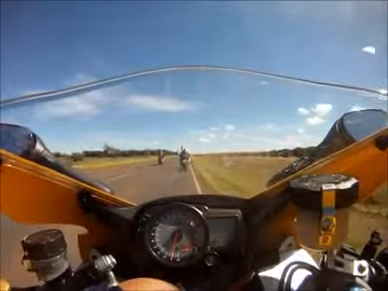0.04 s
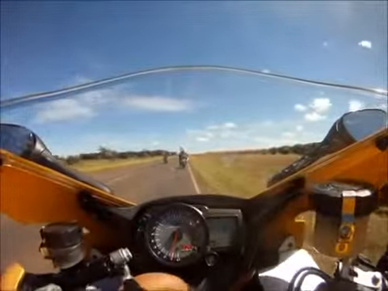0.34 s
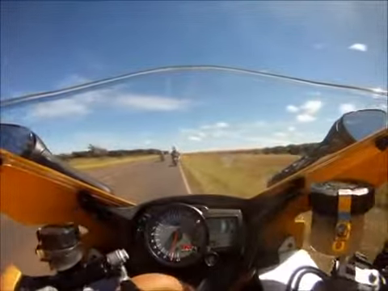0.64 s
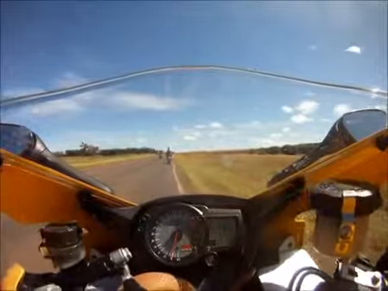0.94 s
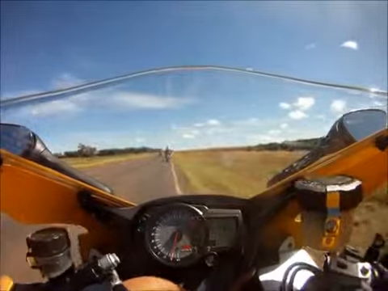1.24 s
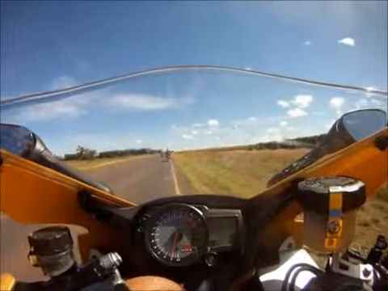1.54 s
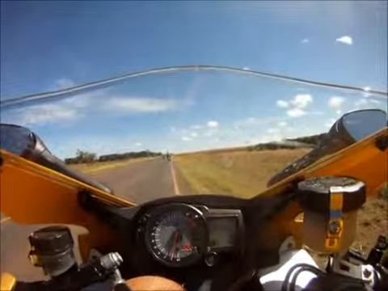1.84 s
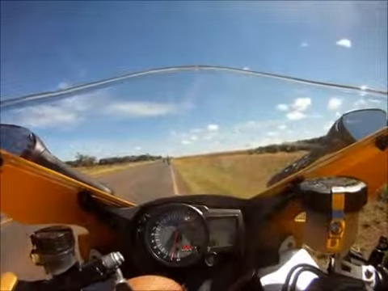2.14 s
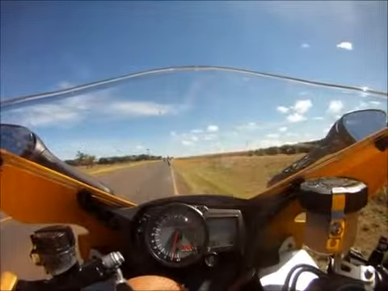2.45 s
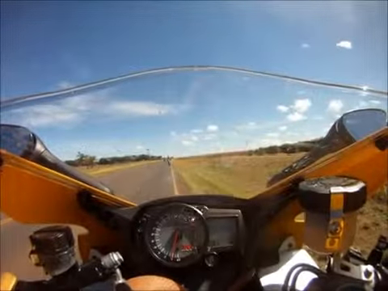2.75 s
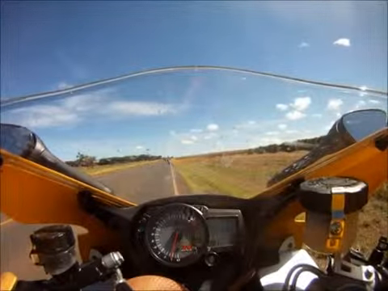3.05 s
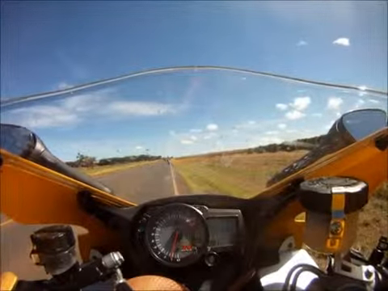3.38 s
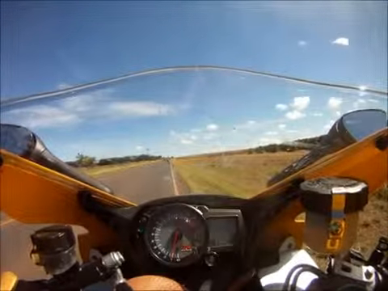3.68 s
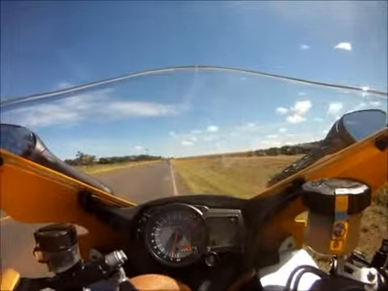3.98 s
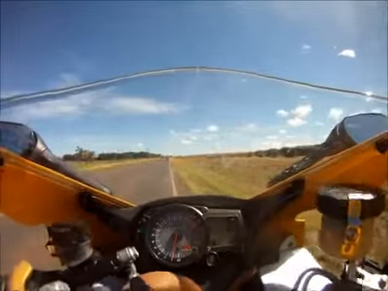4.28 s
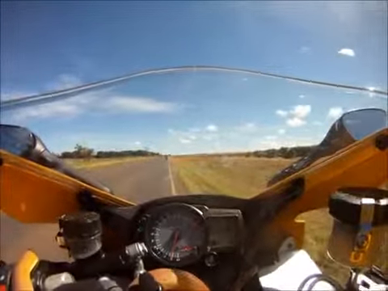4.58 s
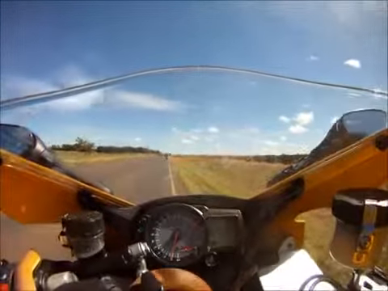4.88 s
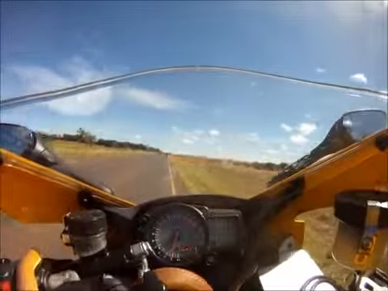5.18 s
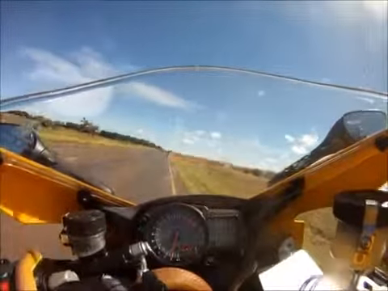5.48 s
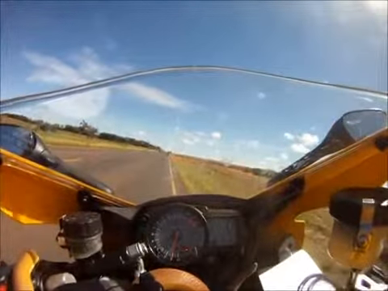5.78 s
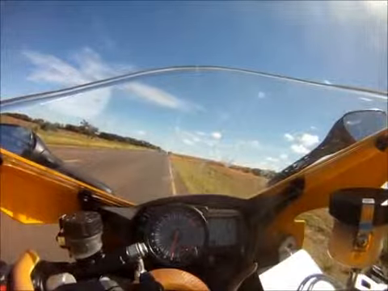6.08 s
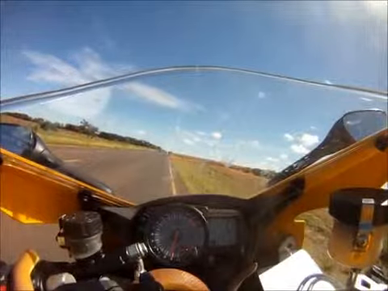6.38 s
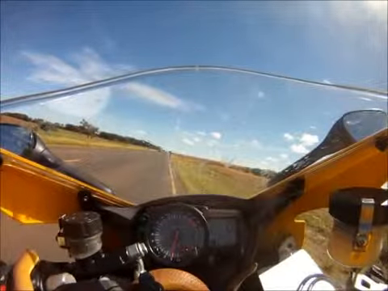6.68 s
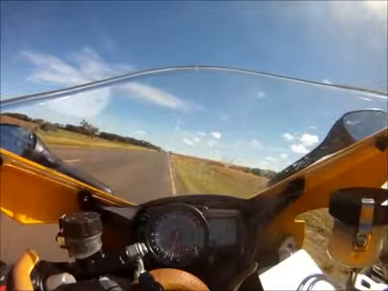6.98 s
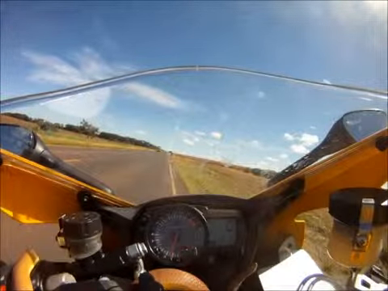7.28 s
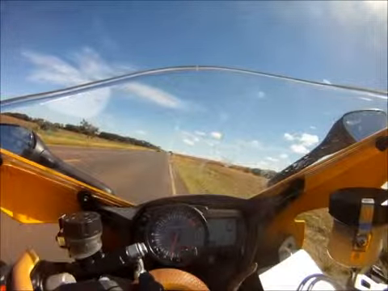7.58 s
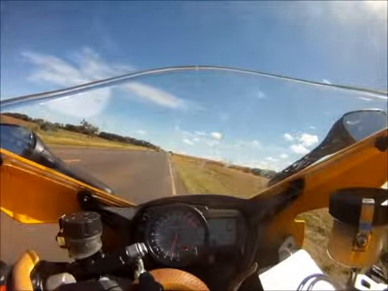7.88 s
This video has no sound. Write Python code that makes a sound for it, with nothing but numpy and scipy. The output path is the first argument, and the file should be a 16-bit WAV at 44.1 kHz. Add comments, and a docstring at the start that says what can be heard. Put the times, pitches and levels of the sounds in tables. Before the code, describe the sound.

Heard from the rider's seat outdoors, a stationary motorcycle engine rumbles at an even idle throughout, with soft valve chatter and a faint, thin sizzle on top. Behind it, other motorcycles pull away through the gears, each slowly rising whine cutting off before the next begins. Small clicks from the controls and occasional hollow pops dot the first half, and the idle carries on as the bikes recede.

```python
"""A four-cylinder sports motorcycle idles at the roadside, heard from behind its windscreen.
Its periodic firings excite the resonances of pipe, silencer and engine covers. Other motorcycles
accelerate away through their gears, their treble fading with distance. Dull pops sound now and then,
and the controls click and scuff. A slow sample-and-hold stage mirrors the spectrum into a thin sizzle."""
import sys
import numpy as np
from scipy.fft import rfft, irfft, next_fast_len
from scipy.io import wavfile
from scipy.ndimage import map_coordinates

SR = 44100
rng = np.random.default_rng(int(sys.argv[2]) if len(sys.argv) > 2 else 0)


def generate_wav(sig):
    """Save sig (samples, or channels by samples) to the path in sys.argv[1] as 16-bit PCM at SR."""
    pcm = np.round(np.clip(np.atleast_2d(sig).T, -1, 1) * 32767).astype(np.int16)
    wavfile.write(sys.argv[1], SR, pcm)


N = 354118

# spectrum of the roar far up the road: (frequency [Hz], relative density [dB])
ROAR_SPECTRUM = [(150, -35), (330, 2), (420, 0.5), (480, 1.5), (540, 0.5), (630, -4), (700, -13.5),
                 (800, -29.5), (1400, -41)]


def amp(db):
    """Amplitude ratio of a level in decibels."""
    return 10 ** (np.asarray(db) / 20)


def unit(x):
    """Normalisation to rms 1."""
    return x / np.sqrt(np.mean(x ** 2) + 1e-20)


def tone(points, hz):
    """Gain interpolated in log frequency between (frequency [Hz], level [dB]) points."""
    f, db = np.transpose(points)
    return amp(np.interp(np.log(hz + 1), np.log(f + 1), db))


def curve(points):
    """Linear interpolation of (time [s], value) points at every sample."""
    times, values = np.transpose(points)
    return np.interp(np.arange(N) / SR, times, values)


def wobble(rate):
    """Smooth random modulation: a spline through rate Gaussian knots a second."""
    knots = rng.standard_normal(int(N * rate / SR) + 4)
    return map_coordinates(knots, [np.arange(N) * rate / SR])


def filtered(x, response):
    """Linear filtering: the spectrum of x times a frequency response."""
    size = next_fast_len(N + SR // 2)
    hz = np.fft.rfftfreq(size, 1 / SR)
    return irfft(rfft(x, size) * response(hz), size)[..., :N]


def noise(spectrum):
    """White noise coloured by a spectrum, at rms 1."""
    return unit(filtered(rng.standard_normal(N), lambda f: tone(spectrum, f)))


def resonance(f, hz, width_hz):
    """Response of a damped oscillator, with gain 1 at its centre."""
    return 1j * f * width_hz / (hz * hz - f * f + 1j * f * width_hz)


def modal_response(f, modes):
    """Superposition of a direct path and a body's resonant modes."""
    return 1 + sum(amp(db) * resonance(f, hz, width) for hz, width, db in modes)


def crank(jitter_firings=0.026):
    """Phase, counted in firings, is the integral of firing rate; uneven burning makes it jitter."""
    # the idle hunting around its set speed: (time [s], firing rate [Hz])
    idle_rate = [(0.0, 36.59), (0.43, 38.11), (0.58, 35.34), (0.99, 40.32), (1.14, 37.47), (1.61, 39.23),
                 (2.2, 39.39), (2.86, 37.49), (3.31, 37.86), (3.4, 35.24), (3.69, 41.35), (4.14, 36.25),
                 (4.46, 38.88), (4.64, 36.8), (5.47, 37.82), (6.57, 37.99), (6.63, 40.56), (6.89, 37.57),
                 (7.04, 39.66), (7.49, 37.09), (7.72, 40.85), (8.03, 40.15)]
    firings = np.cumsum(curve(idle_rate)) / SR + 0.25
    return firings + jitter_firings * wobble(12)


def firing_pulses(firings, pattern, scatter_db):
    """An impulse train, one per firing, whose strengths repeat as the cylinders take turns."""
    onsets = np.flatnonzero(np.diff(np.floor(firings))) + 1
    scatter = amp(scatter_db * rng.standard_normal(len(onsets)))
    pulses = np.zeros(N)
    pulses[onsets] = np.resize(pattern, len(onsets)) * scatter
    return pulses


def exhaust(firings, puff_hz=111.9, boom_hz=73.6, boom_width_hz=14.5, drive_db=26.0):
    """Source and filter: each firing's puff excites the resonances of pipe and silencer."""
    # the cylinders in firing order: (relative strength [dB])
    cylinders = [0.76, 0.15, 0.87, -0.45]
    pulses = amp(drive_db) * firing_pulses(firings, amp(cylinders), scatter_db=0.34)
    # the outlet radiates the rate of change of a bell-shaped puff of flow
    puff = lambda f: -1j * f / puff_hz * np.exp(-(f / puff_hz) ** 2 / 2)
    silencer = lambda f: 1j * f / boom_width_hz * resonance(f, boom_hz, boom_width_hz)
    pipe = lambda f: 1 + amp(13.0) * resonance(f, hz=196, width_hz=90)
    return filtered(pulses, lambda f: puff(f) * silencer(f) * pipe(f))


def headers(firings, ring_hz=202, width_hz=35, level_db=-27.0, lag=0.5747):
    """Cylinder pairs in antiphase slosh gas between their pipes, adding tones midway between harmonics."""
    pushes = firing_pulses(firings - lag, [-1, 1], scatter_db=1.23)
    slosh = filtered(pushes, lambda f: np.exp(-((f - ring_hz) / width_hz) ** 2 / 2))
    return amp(level_db) * unit(slosh)


def shake(firings, level_db=-40):
    """Forced vibration: the pistons drive the frame at the firing rate."""
    return -amp(level_db) * np.sin(2 * np.pi * firings)


def gas(firings, level_db=-30.0, swing_db=3.5, lag=0.12, uneven_db=0.6):
    """Turbulent flow noise swells after each puff, some harder than others."""
    # gas rushing in the silencer: (frequency [Hz], relative density [dB])
    flow_spectrum = [(20, -24), (45, -14), (70, -3.5), (130, -1.5), (175, -7), (210, -1.5), (245, -5),
                     (290, -7.5), (330, -14.5), (520, -18.5), (660, -21.5), (780, -38), (1500, -58)]
    gust_db = swing_db * np.cos(2 * np.pi * (firings - lag)) + uneven_db * wobble(38)
    return amp(level_db) * unit(noise(flow_spectrum) * amp(gust_db))


def clatter(firings, swing_db=2, turn_db=0.24, lag=0.16, grain_db=1.18):
    """Valve and clutch noise, modulated at each firing and each turn, excites the covers' modes."""
    # valve gear and clutch: (frequency [Hz], relative density [dB])
    chatter_spectrum = [(300, -17), (700, 2.5), (950, -1), (1500, 1), (2000, 0), (2700, -0.5), (3500, -3),
                        (4200, -6.5), (5000, -9.5), (5800, -5.5)]
    # modes of the engine covers: (frequency [Hz], bandwidth [Hz], gain [dB])
    cover_modes = [(1145, 34, 6.7), (2303, 23, 5.5), (2960, 123, 3.1), (4660, 300, 1.7)]
    # slow drift of the clatter: (time [s], level [dB])
    clatter_level = [(0, -43), (3.8, -43), (4.6, -42), (5.7, -42), (6.7, -43.5), (8.03, -43)]
    beat_db = swing_db * np.cos(2 * np.pi * (firings - lag)) + turn_db * np.cos(np.pi * firings)
    chatter = rng.standard_normal(N) * amp(beat_db + grain_db * wobble(260))
    radiated = filtered(chatter, lambda f: tone(chatter_spectrum, f) * modal_response(f, cover_modes))
    return amp(curve(clatter_level)) * unit(radiated)


def pull(start, end, first_hz, last_hz, howl_db, drone_db, roar_db):
    """A distant exhaust's harmonic series climbs through one gear; the air adds flutter and a roar."""
    # spectral envelope of the harmonics: (frequency [Hz], gain [dB])
    howl_spectrum = [(220, 4), (295, -0.5), (325, -18), (380, -11), (405, -3), (430, 0), (460, -4),
                     (485, -12), (510, -5), (545, 4.5), (600, -4.5), (645, -12), (800, -46), (1200, -54)]
    open_s, shut_s = 0.017, 0.031
    roar_decay_db_per_s, dulling_db_per_s, treble_hz = 21.5, 1.94, 500
    flutter_db, pitch_waver = 1.8, 0.0027
    t = np.arange(N) / SR
    throttle = np.clip((t - start) / open_s, 0, 1) * np.clip(1 - (t - end) / shut_s, 0, 1)
    hz = np.interp(t, [start, end], [first_hz, last_hz])
    phase = 2 * np.pi * np.cumsum(hz * (1 + pitch_waver * wobble(30))) / SR
    flare = amp(roar_db - roar_decay_db_per_s * np.maximum(t - start, 0))
    sound = amp(drone_db) * np.sin(phase) + flare * noise(ROAR_SPECTRUM)
    on = throttle > 0
    for k in range(2, 8):
        # growing distance takes away the treble
        loss_db = dulling_db_per_s * t[on] / (1 + (treble_hz / (k * hz[on])) ** 20)
        gain = amp(howl_db - loss_db + flutter_db * wobble(16)[on])
        sound[on] += tone(howl_spectrum, k * hz[on]) * gain * np.sin(k * phase[on])
    return throttle * sound


def riders_ahead():
    """Superposition of receding motorcycles, gear after gear, on a roar that never quite dies."""
    # one row per gear: (throttle opens [s], shuts [s], first firing rate [Hz], last firing rate [Hz],
    # harmonic gain [dB], fundamental level [dB], initial roar level [dB])
    gears = [(-.1, .08, 120, 122, -30.5, -22, -29.5), (0.254, 1.44, 105.4, 119.7, -34, -53, -29.5),
             (2.001, 4.062, 126.6, 150.2, -40, -29.5, -39), (4.43, 5.793, 132.5, 138.9, -42, -30, -39.5),
             (6.456, 7.314, 140.9, 149.8, -43, -32, -42)]
    # blurred roar from far up the road: (time [s], level [dB])
    roar_level = [(0, -38), (1.3, -39), (2.6, -49), (4.3, -45), (6, -40), (6.35, -49.5), (8.03, -39)]
    return sum(pull(*gear) for gear in gears) + amp(curve(roar_level)) * noise(ROAR_SPECTRUM)


def burst(hiss, start, db, length, rise_s=0.00026):
    """A noise transient with an exponential attack and a Gaussian decay."""
    age = np.maximum(np.arange(N) / SR - start, 0)
    envelope = (1 - np.exp(-age / rise_s)) * np.exp(-np.minimum(age / length, 6) ** 2)
    return amp(db) * envelope.std() * unit(envelope * hiss)


def pops(width_hz=220, cutoff_hz=760):
    """A heavily damped resonance gives each dull pop its own hollow pitch."""
    # dull pops: (time [s], level [dB], decay time [s], pitch [Hz])
    pop_events = [(0.03, -44, 0.0079, 596), (0.33, -47, 0.0083, 500), (1.433, -32, 0.012, 634),
                  (1.443, -31, .015, 636.6), (2.133, -30, 0.0058, 636), (4.418, -31, 0.011, 510),
                  (4.459, -32.5, 0.025, 503)]
    hiss = rng.standard_normal(N)

    def hollow(hz):
        return unit(filtered(hiss, lambda f: resonance(f, hz, width_hz) / (1 + (f / cutoff_hz) ** 10)))

    return sum(burst(hollow(hz), start, db, length) for start, db, length, hz in pop_events)


def ticks(gain_db=-0.5):
    """Impact and friction at the controls excite the lever's modes; heavier parts reach lower."""
    # clicks and scuffs: (time [s], relative level [dB], decay time [s], low cutoff [Hz])
    contact_events = [(0.602, -42, .008, 1980), (1.502, -41, 0.0074, 2000), (2.18, -44.5, 0.04, 2140),
                      (2.524, -34.5, 0.014, 1690), (3.121, -39.5, 0.018, 2100), (3.141, -43, 0.048, 2120),
                      (3.312, -37.5, 0.012, 1855), (4.417, -32, 0.0045, 800), (4.423, -48, 0.14, 900)]
    # contact noise of small hard parts: (frequency [Hz], relative density [dB])
    contact_spectrum = [(400, -22), (1200, 4), (1800, -4), (2300, 0), (3000, -3), (3800, -4.5), (4700, -5),
                        (5600, -16)]
    # modes of the lever: (frequency [Hz], bandwidth [Hz], gain [dB])
    lever_modes = [(2187, 60, 5), (2650, 48, 8), (2940, 74, 3.5)]
    hiss = noise(contact_spectrum)
    above = lambda hz: unit(filtered(hiss, lambda f: 1 - 1 / (1 + (f / hz) ** 8)))
    contacts = sum(burst(above(hz), start, db, length) for start, db, length, hz in contact_events)
    return amp(gain_db) * filtered(contacts, lambda f: modal_response(f, lever_modes))


def scene():
    """Mid-side stereo: a very faint noise, opposite in the two channels, adds slight width."""
    # very faint side noise: (frequency [Hz], relative density [dB])
    faint_width_noise_spectrum = [(25, 13), (80, 10.5), (160, 0), (300, 16.5), (500, 15), (1100, 10),
                                  (2500, -0.5), (4000, -6), (5000, -5)]
    firings = crank()
    engine = exhaust(firings) + headers(firings) + shake(firings) + gas(firings) + clatter(firings)
    middle = engine + riders_ahead() + ticks() + pops()
    side = amp(-59.5) * noise(faint_width_noise_spectrum)
    return np.array([middle + side, middle - side])


def record(dry, hold_hz=12000, edge_hz=5400, top_hz=15500, hiss_db=-60):
    """Spectral imaging: holding each slow sample mirrors the sound about the sampling rate."""
    # thin steady hiss under the mirrored sizzle: (frequency [Hz], relative density [dB])
    hiss_spectrum = [(9000, -50), (11200, -22), (11600, -4), (12000, -2), (12400, -4), (12800, -30),
                     (15000, -50)]
    narrow = filtered(dry, lambda f: 1 / np.sqrt(1 + (f / edge_hz) ** 40))
    mirrored = narrow * (1 + 2 * np.cos(2 * np.pi * hold_hz * np.arange(N) / SR))
    held = filtered(mirrored, lambda f: np.sinc(f / hold_hz))
    return filtered(held + amp(hiss_db) * noise(hiss_spectrum), lambda f: f < top_hz)


dry = scene()
out = record(dry)
generate_wav(out)
```